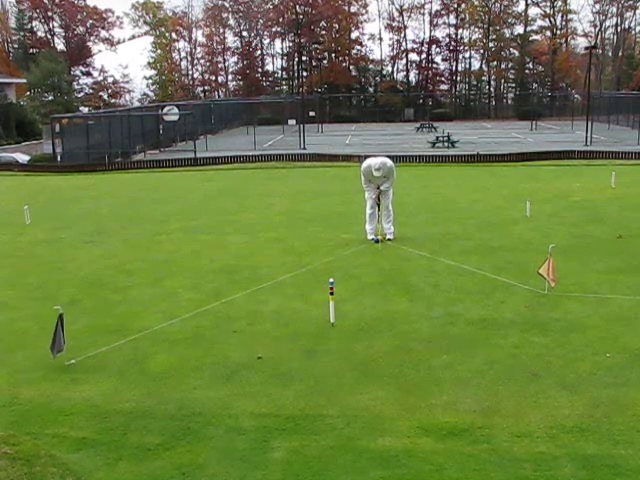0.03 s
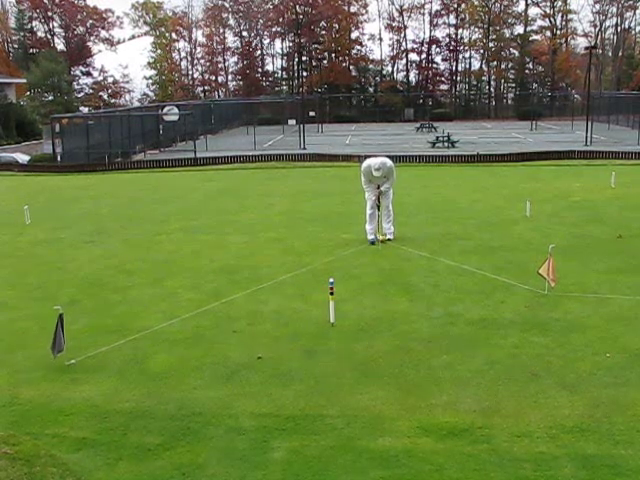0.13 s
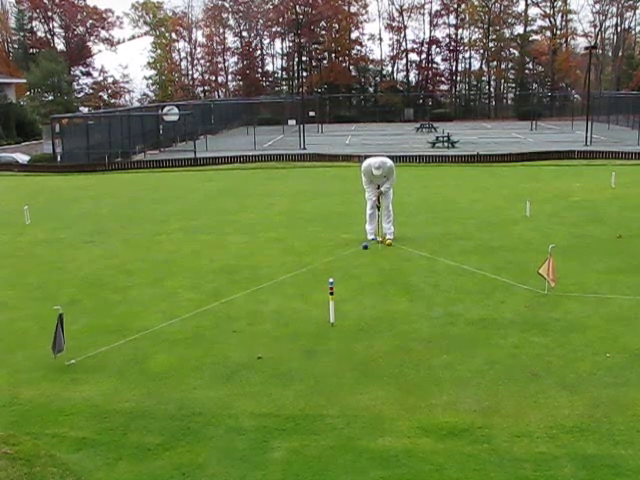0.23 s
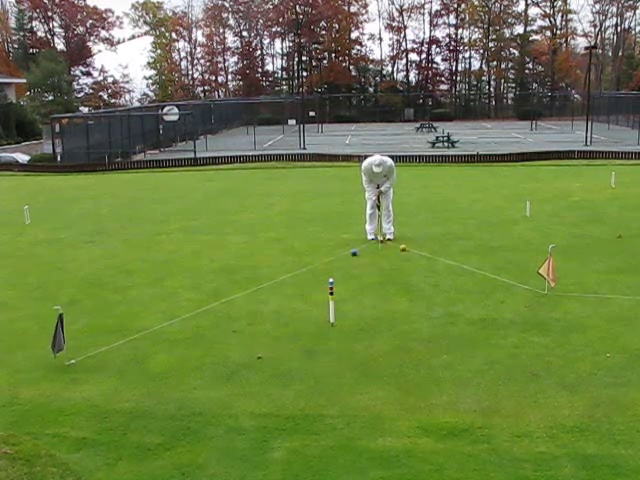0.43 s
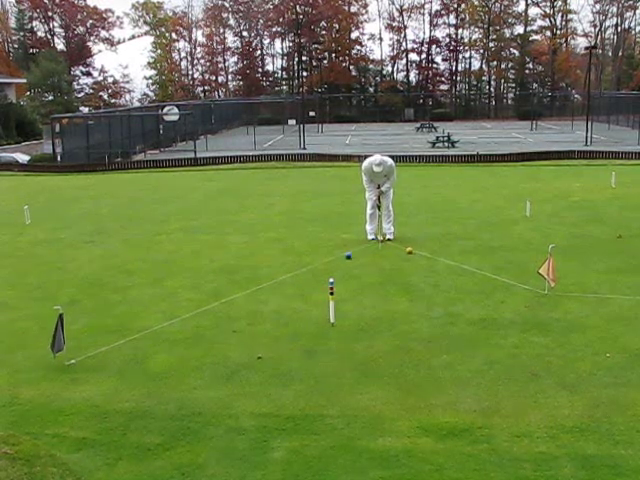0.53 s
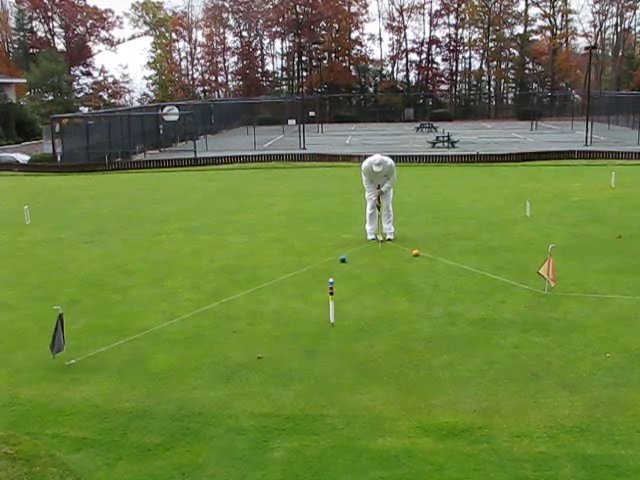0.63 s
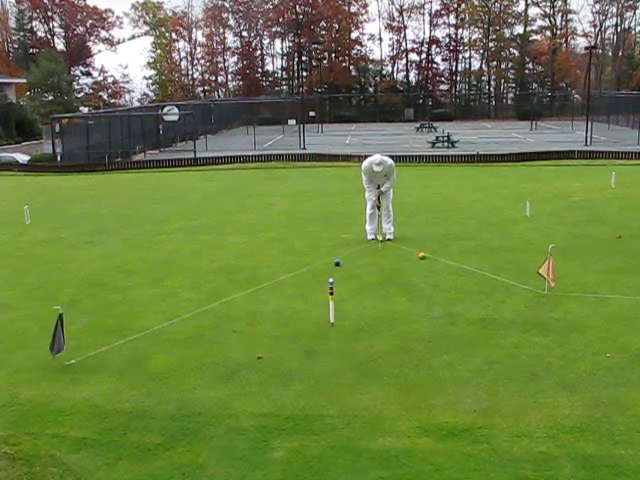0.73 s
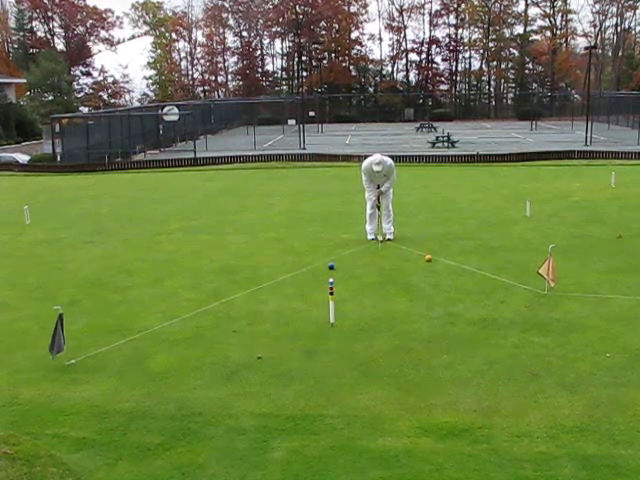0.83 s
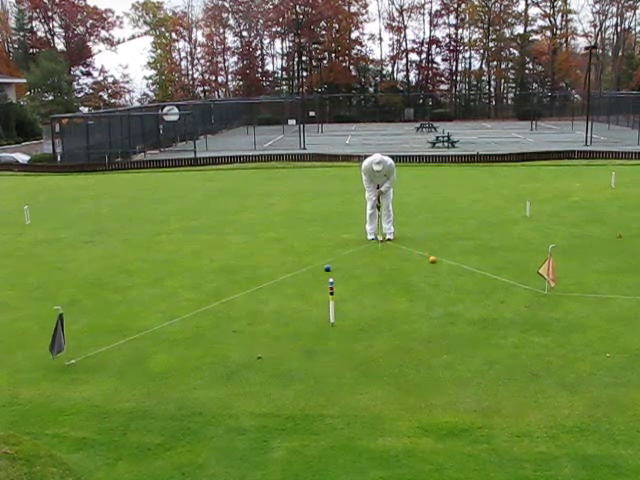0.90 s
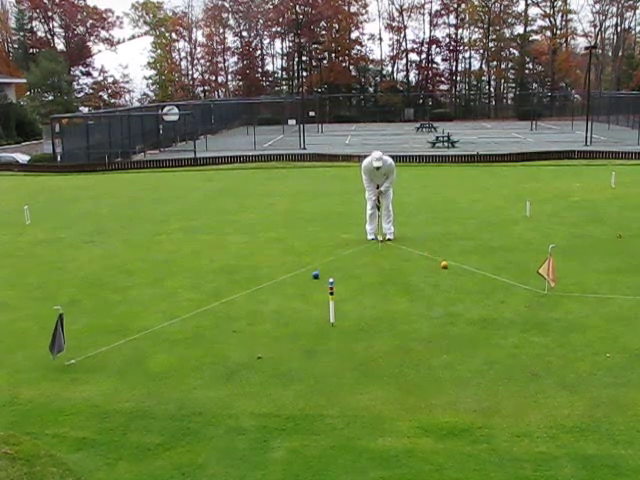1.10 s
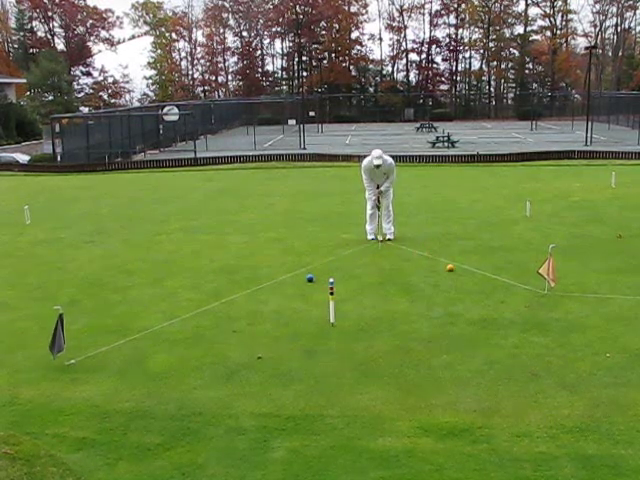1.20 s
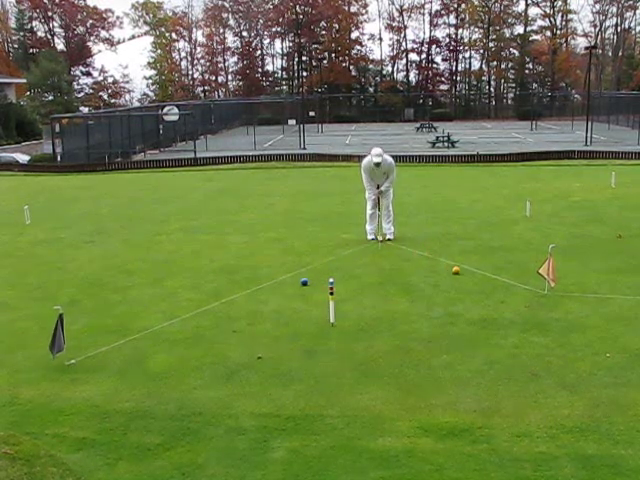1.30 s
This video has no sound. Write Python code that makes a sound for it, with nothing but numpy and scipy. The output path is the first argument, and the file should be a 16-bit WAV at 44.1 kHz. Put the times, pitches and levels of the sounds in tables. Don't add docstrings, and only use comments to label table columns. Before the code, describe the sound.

One sharp mallet-and-ball clack, slightly overloaded, bursts close and central near the start, then dies quickly into a faint outdoor echo. A far garden motor, soft hum, rustling leaves and light wind continue, heard through a small camera microphone.

```python
import sys
import numpy as np
from scipy import signal
from scipy.fft import rfft, irfft, next_fast_len
from scipy.io import wavfile
from scipy.ndimage import uniform_filter1d, map_coordinates

SR = 44100
rng = np.random.default_rng(int(sys.argv[2]) if len(sys.argv) > 2 else 0)


def undo_db(level):
    steps = np.asarray(level, float) / 20
    return 10 ** steps


def dump(signal):
    limited = np.clip(np.atleast_2d(signal).T, -1, 1)
    pcm = np.round(limited * 32767).astype(np.int16)
    wavfile.write(sys.argv[1], SR, pcm)


N = 59535

# multiple of firing rate, level/dB
ENGINE_ORDERS = [(1, -60.5), (2, -59.5), (4, -43.5), (6, -51), (8, -56), (10, -57.5), (12, -60),
                 (28, -54.5)]
# f/Hz, density/dB
ROAR_SPECTRUM = [(60, -4), (140, 0), (200, -5.5), (450, 4.5), (1000, -2.5), (1700, -12), (4500, -16),
                 (13000, -36)]
# f/Hz, left port lead/rad
ROAR_LEFT_LEAD = [(200, .1), (1100, 0.6), (2200, 2.3), (3700, 3.36), (6000, 3), (10000, 2.2), (12500, 1)]
# f/Hz, level/dB
HUM_LINES = [(119.7, -56.5), (221, -58), (359.5, -53)]
# f/Hz, level/dB
WHINE_LINES = [(7854, -79), (7881, -78)]
# f/Hz, density/dB
LEAF_SPECTRUM = [(200, -19), (500, -14), (1500, -2.5), (4000, -10.5), (8000, -23.5), (13000, -28.5)]
# f/Hz, density/dB
BUFFET_SPECTRUM = [(15, -31), (40, 0), (90, 3), (200, -19), (400, -44)]
# f/Hz, level/dB, t60/s, direction (signed gain)
HEAD_MODES = [(578, 3.5, 0.0052, 0.81), (980, 4.5, 0.0065, -0.85), (1457, 2, 0.0042, -0.94)]
# f/Hz, level/dB, t60/s, direction (sign)
BALL_MODES = [(1480, -10.5, .012, -1), (3000, -15.5, .0036, -1), (3300, -33, .012, 1),
              (3970, -10, .0078, -1), (4510, -16, .0095, 1), (5120, -21.5, .0095, -1), (5900, -28, .006, 1)]
# t/s after the knock, level/dB
FENCE_ECHOES = [
    (.0995, -27),
]

FIRING_HZ, SHAFT_WANDER, ORDER_SWAY_DB = 75.3, 0.00304, 0.85
ROAR_DB, ROAR_PAN_DB, CHUFF_DEPTH = -42, 1.8, 0.13
FAN_HZ, FAN_WIDTH_HZ, FAN_DB = 2066, 240, 13.5
WHINE_LAG_S, WHINE_WIDE_HZ = .00003, 15000
LEAVES_DB = -45
BUFFET_DB, BUFFET_PAN_DB, BUFFET_SHARED = -55, 9, 0.34
BLOW_S, RELEASE_S = .23122, .00025
LAWN_DELAY_S, LAWN_DB = .00169, -14
CRACK_DB, CRACK_T60_S, CRACK_HZ = -26.5, .01, 6000
KNOCK_LAG_S, KNOCK_PAN_DB, KNOCK_WIDE_HZ = .00007, 0, 1500
FENCE_HZ, TAIL_DB, TAIL_T60_S, TAIL_RISE_S = 1190, -18.5, 0.43, 0.11
DUCK_DB, RECOVER_DB_PER_S, DUCK_DELAY_S, DUCK_SMOOTH_S = 8, 13.5, 0.0058, 0.0024
CEILING, KNEE_POWER = 1.02, 16
BAND_TOP_HZ, ROLL_HZ, ROLL_DB = 13345, 12600, -6
PORT_SIDE = np.array([[.5], [-.5]])


def unit(x):
    return x / np.sqrt(np.mean(x ** 2) + 1e-20)


def along(points, hz):
    f, v = np.transpose(points)
    return np.interp(np.log(hz + 1), np.log(f + 1), v)


def wobble(rate_hz):
    knots = rng.standard_normal(int(N * rate_hz / SR) + 4)
    return map_coordinates(knots, [np.arange(N) * rate_hz / SR])


def filtered(x, response):
    m = next_fast_len(N + SR // 2)
    return irfft(rfft(x, m) * response(np.fft.rfftfreq(m, 1 / SR)), m)[..., :N]


def placed(x, lag_s, pan_db, wide_hz):
    def ports(hz):
        lag = PORT_SIDE * lag_s / (1 + (hz / wide_hz) ** 2)
        return undo_db(PORT_SIDE * pan_db) * np.exp(-2j * np.pi * hz * lag)
    return filtered(x, ports)


def rush(spectrum, patchy_db, channels):
    z = signal.stft(rng.standard_normal((channels, N)), nperseg=512)[2]
    field = uniform_filter1d(rng.standard_normal(z.shape[1:]), 6, 0)
    field = uniform_filter1d(field, 12, 1)
    noise = signal.istft(z * undo_db(patchy_db * unit(field)), nperseg=512)[1][:, :N]
    return unit(filtered(noise, lambda hz: undo_db(along(spectrum, hz))))


def engine():
    shaft_rad = 2 * np.pi * np.cumsum(FIRING_HZ * (1 + SHAFT_WANDER * wobble(5.99))) / SR
    tones = np.zeros(N)
    for order, db in ENGINE_ORDERS:
        level = np.sqrt(2) * undo_db(db + ORDER_SWAY_DB * wobble(10))
        tones += level * np.sin(order * shaft_rad + 2 * np.pi * rng.random())
    roar = rush(ROAR_SPECTRUM, patchy_db=1.0, channels=1)[0]
    roar = roar * (1 + CHUFF_DEPTH * np.cos(shaft_rad))
    roar = filtered(roar, lambda hz: undo_db(FAN_DB * np.exp(-((hz - FAN_HZ) / FAN_WIDTH_HZ) ** 2)))
    roar = undo_db(ROAR_DB + 0.22 * wobble(3.6)) * roar

    def ports(hz):
        return undo_db(PORT_SIDE * ROAR_PAN_DB) * np.exp(1j * PORT_SIDE * along(ROAR_LEFT_LEAD, hz))
    return filtered(tones + roar, ports)


def hum(lines):
    t = np.arange(N) / SR
    total = np.zeros(N)
    for hz, db in lines:
        level = np.sqrt(2) * undo_db(db + 2.0 * wobble(7.64))
        total += level * np.sin(2 * np.pi * hz * t + 0.83 * wobble(6.87))
    return total


def whine():
    return placed(hum(WHINE_LINES), WHINE_LAG_S, 0, WHINE_WIDE_HZ)


def leaves():
    return undo_db(LEAVES_DB) * rush(LEAF_SPECTRUM, patchy_db=-0.98, channels=2)


def wind():
    lumps = undo_db(2.4 * wobble(8.1) + PORT_SIDE * BUFFET_PAN_DB)
    buffet = rush(BUFFET_SPECTRUM, patchy_db=2.0, channels=2)
    buffet = buffet + BUFFET_SHARED * buffet[::-1]
    return undo_db(BUFFET_DB) * lumps * buffet


def ring(modes, start_s):
    t = np.clip(np.arange(N) / SR - start_s, 0, None)
    total = np.zeros(N)
    for hz, db, t60_s, direction in modes:
        total += direction * undo_db(db - 60 * t / t60_s) * np.sin(2 * np.pi * hz * t)
    return total


def knock():
    thud = ring(HEAD_MODES, BLOW_S) + undo_db(LAWN_DB) * ring(HEAD_MODES, BLOW_S + LAWN_DELAY_S)
    clack = ring(BALL_MODES, BLOW_S + RELEASE_S)
    t = np.arange(N) / SR - BLOW_S
    crack = (t > 0) * undo_db(CRACK_DB - 60 * np.abs(t) / CRACK_T60_S) * rng.standard_normal(N)
    crack = filtered(crack, lambda hz: (1j * hz / (CRACK_HZ + 1j * hz)) ** 2)
    return thud + clack + crack


def grounds(hit):
    def fences(hz):
        return sum(undo_db(db) * np.exp(-2j * np.pi * hz * s) for s, db in FENCE_ECHOES)
    slaps = filtered(hit, fences)
    t = np.arange(SR // 2) / SR
    tail = rng.standard_normal((2, len(t))) * undo_db(-60 * t / TAIL_T60_S)
    tail = tail * np.clip(t / TAIL_RISE_S, 0, 1) ** 4
    tail = tail / np.linalg.norm(tail[0])
    scatter = undo_db(TAIL_DB) * signal.fftconvolve(hit[None], tail, axes=1)[:, :N]
    return filtered(slaps + scatter, lambda hz: 1 / (1 + 1j * hz / FENCE_HZ))


def scene():
    background = engine() + hum(HUM_LINES) + whine() + leaves() + wind()
    hit = knock()
    direct = placed(hit, KNOCK_LAG_S, KNOCK_PAN_DB, KNOCK_WIDE_HZ)
    return background + direct + grounds(hit)


def top_cut(x):
    return signal.sosfilt(signal.butter(12, 13340, fs=SR, output="sos"), x)


def record(dry):
    climb_db = RECOVER_DB_PER_S * np.arange(N) / SR
    over = np.abs(dry).max(0) > CEILING
    held_db = np.maximum.accumulate(np.where(over, DUCK_DB + climb_db, -99))
    duck_db = np.clip(held_db - climb_db, 0, None)
    duck_db = np.pad(duck_db, (round(DUCK_DELAY_S * SR), 0))[:N]
    duck_db = uniform_filter1d(duck_db, max(1, round(DUCK_SMOOTH_S * SR)))
    x = dry * undo_db(-duck_db)
    x = x / (1 + np.abs(x / CEILING) ** KNEE_POWER) ** (1 / KNEE_POWER)
    x = filtered(x, lambda hz: (hz < BAND_TOP_HZ) * undo_db(ROLL_DB * (hz > ROLL_HZ)))
    return top_cut(x)


dry = scene()
out = record(dry)
dump(out)
```